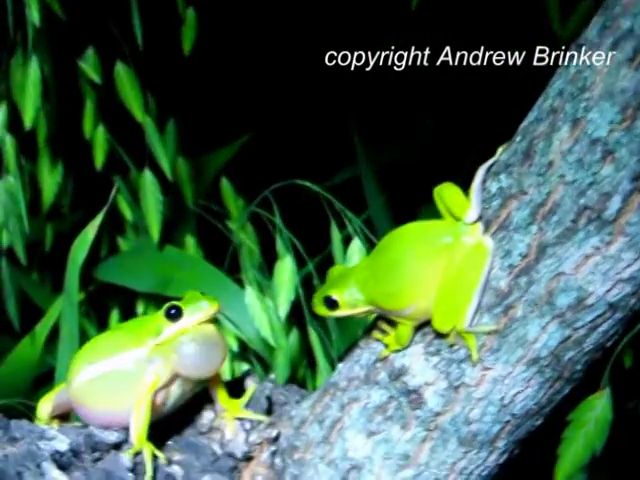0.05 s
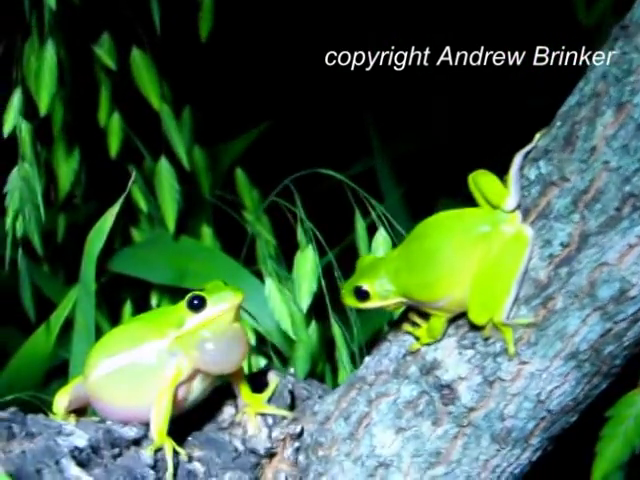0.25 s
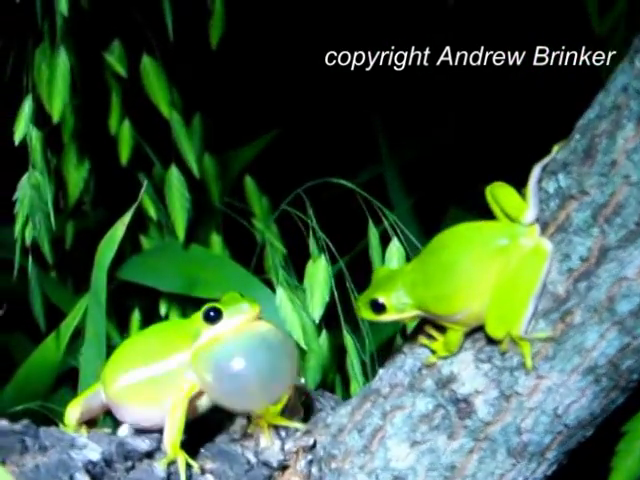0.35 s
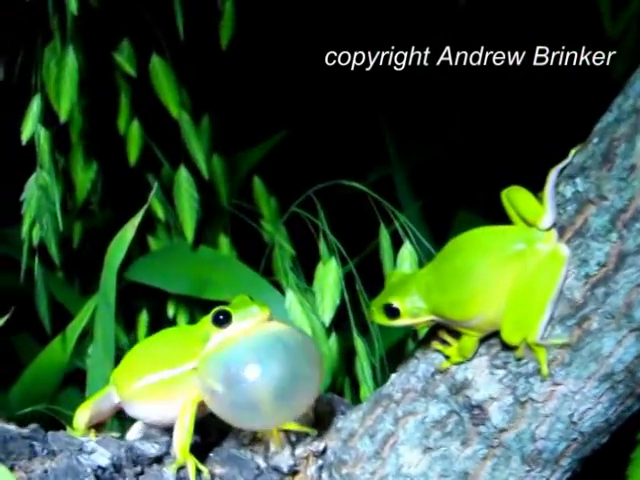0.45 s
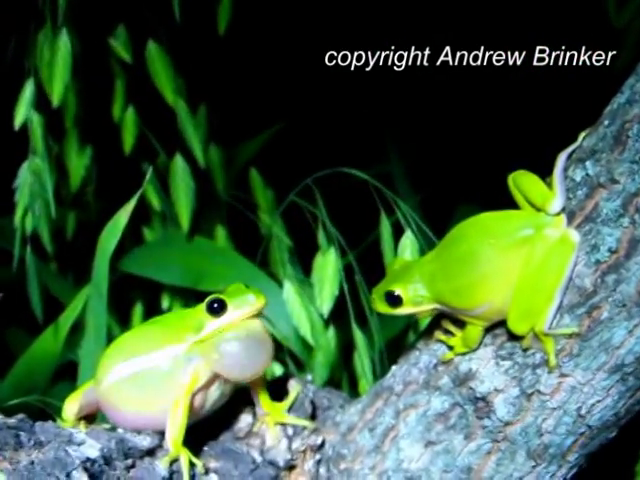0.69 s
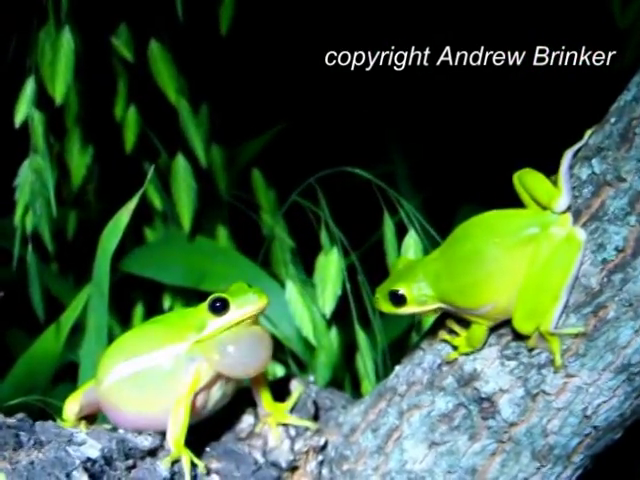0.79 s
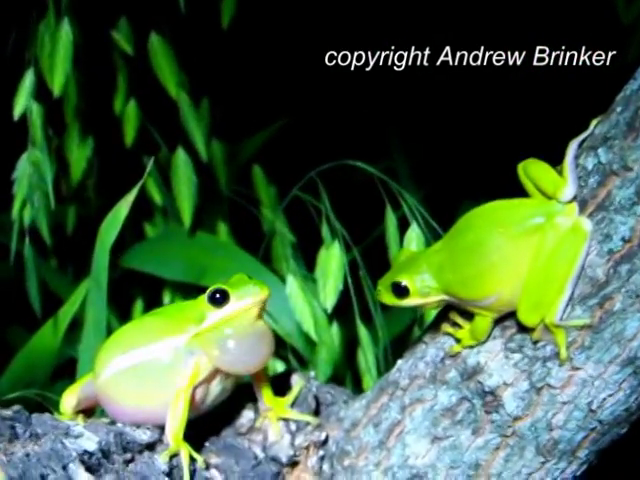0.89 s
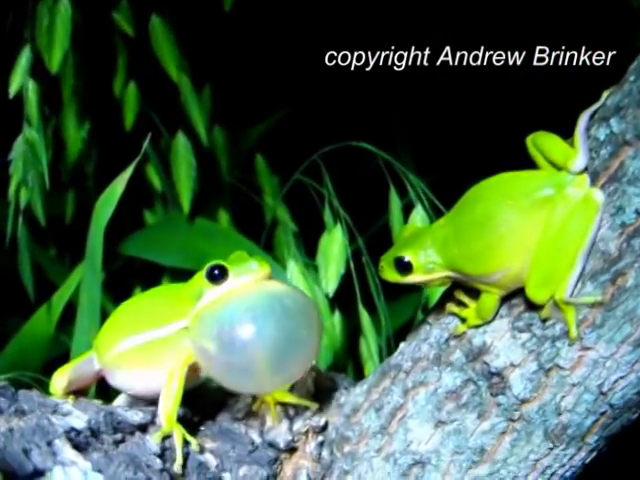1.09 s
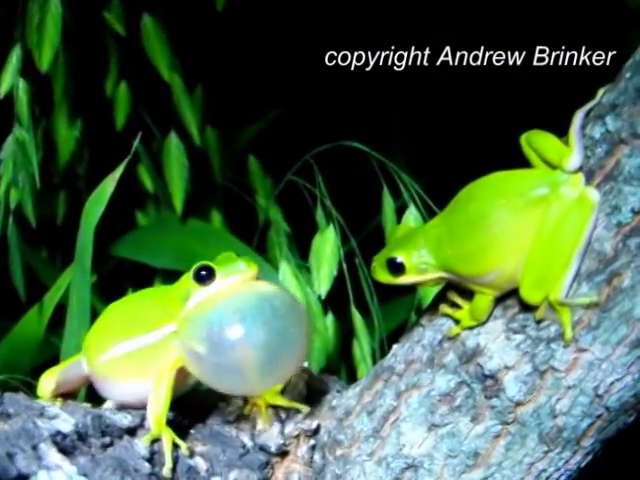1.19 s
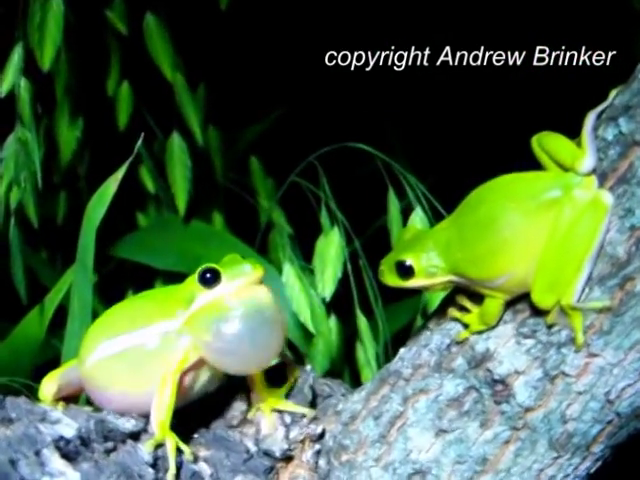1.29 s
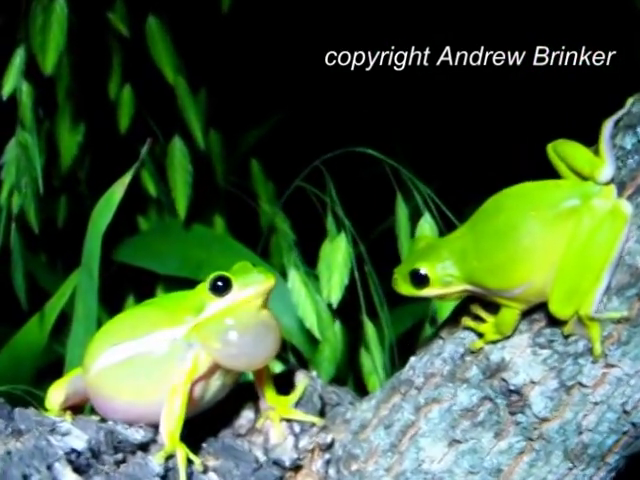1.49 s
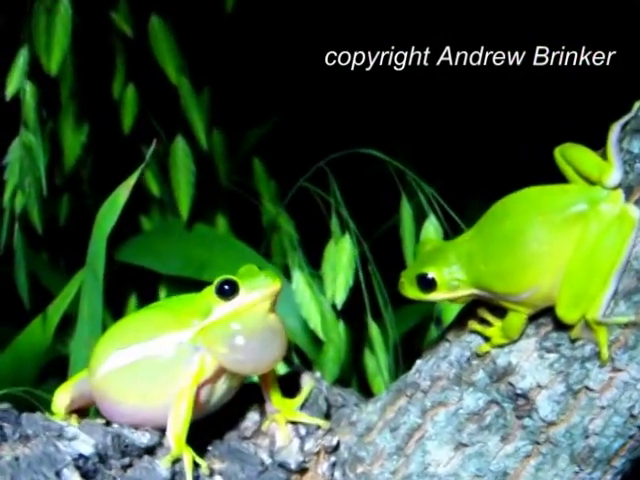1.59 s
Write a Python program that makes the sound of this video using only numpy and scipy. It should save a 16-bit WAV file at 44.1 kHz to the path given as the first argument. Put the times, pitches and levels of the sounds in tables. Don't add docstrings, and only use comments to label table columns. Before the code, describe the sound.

A tree frog close to the microphone gives two loud, nasal, rasping croaks, at about 0.23-0.43 and 0.91-1.09 seconds. The first starts slowly, locks into a bright buzz and tails off; the second starts rough and ends stumbling. Quieter frogs answer throughout, clearest near 1.3 and 1.6, over a blurred woodland chorus and faint cricket scrapes that dip under the croaks.

```python
import sys
import numpy as np
from scipy import signal
from scipy.fft import rfft, irfft, next_fast_len
from scipy.io import wavfile
from scipy.ndimage import uniform_filter1d

SR = 44100
rng = np.random.default_rng(int(sys.argv[2]) if len(sys.argv) > 2 else 0)


def invert_db(level):
    return 10 ** (np.asarray(level, dtype=float) / 20)


def wav_out(sig):
    wavfile.write(sys.argv[1], SR, np.round(np.clip(np.atleast_2d(sig).T, -1, 1) * 32767).astype(np.int16))


N = 72765
AIR_TOP_HZ = 12700

# time in seconds, rate in pulses per second,
# level in dB, sac resonance in Hz, roughness [0-1].
CROAKS = [
    [(.229, 134, -17.5, 2640, 0.43), (.248, 170, -9, 2530, 0.6), (.256, 174, -10, 2740, 0),
     (.27, 287, -9, 2830, 0), (.29, 288, -7.5, 2780, 0.03), (.36, 283, -12.5, 3108, 0.07),
     (.393, 277, -18, 2840, 0.51), (.399, 940, -30.5, 3100, 0.1), (.432, 650, -46, 2430, 0.2)],
    [(.906, 82, -12.5, 2380, 0.62), (.921, 144, -10.5, 2500, 0.33), (.93, 340, -10, 2755, 0.16),
     (.944, 200, -7, 2580, 0.1), (.951, 290, -9, 2840, 0.02), (1.012, 284, -9.5, 3018, 0.05),
     (1.036, 282, -17.5, 3080, 0.12), (1.056, 210, -16, 2910, 0.71), (1.086, 157, -24.5, 3130, 0.41)],
]


def unit(x):
    return x / np.sqrt(np.mean(x ** 2) + 1e-20)


def filtered(x, response):
    size = next_fast_len(N + 8192)
    spectrum = rfft(x, size) * response(np.fft.rfftfreq(size, 1 / SR))
    return irfft(spectrum, size)[..., :N]


def peak(f, hz, width_hz):
    return 1j * f * width_hz / (hz * hz - f * f + 1j * f * width_hz)


def steep(ratio, order):
    poles = np.exp(1j * np.pi * (2 * np.arange(order) + order + 1) / (2 * order))
    return 1 / np.prod(1j * ratio[..., None] - poles, axis=-1)


def low_cut(hz):
    edge_hz = 715
    return steep(edge_hz / (hz + 1), order=12).conj()


def pan(db):
    return invert_db([[db / 2], [-db / 2]])


def hiss(points, alike, patchy_db):
    z = signal.stft(rng.standard_normal((2, N)), nperseg=512)[2]
    patches = uniform_filter1d(rng.standard_normal(z.shape[1:]), size=5, axis=0)
    patches = unit(uniform_filter1d(patches, size=8, axis=1))
    a, b = signal.istft(z * invert_db(patchy_db * patches), nperseg=512)[1][:, :N]
    turn = np.arccos(np.clip(alike, 0, 1)) / 2
    mid, side = np.cos(turn) * a, np.sin(turn) * b
    f, db = np.transpose(points)

    def colour(hz):
        return invert_db(np.interp(np.log(hz + 1), np.log(f + 1), db, -120, -120))

    return unit(filtered(np.array([mid + side, mid - side]), colour))


def woods(x, t60, alike):
    t = np.arange(SR // 2) / SR
    a, b = rng.standard_normal((2, len(t))) * invert_db(-60 * t / t60)
    tail = np.array([a, alike * a + np.sqrt(abs(1 - alike ** 2)) * b])
    return signal.fftconvolve(x[None], tail / np.linalg.norm(a), axes=1)[:, :N]


def croak(rows, throat_db=0, size=1, air_db=0):
    # frequency in Hz, width in Hz, level in dB.
    throat_modes = [(866, 71.3, -8.5), (1093, 122, -15), (2000, 1240, -20), (2186, 353, -15)]
    # frequency in Hz, width in Hz, level in dB.
    air_modes = [(4900, 860, -23.5), (6880, 2000, -41), (9180, 1100, -32), (11900, 2800, -34)]
    ring, max_pulses = 1024, 80
    jitter, scatter_db, slack_throat_db = 0.086, 4, 17.5
    rasp, air_noise = 0.45, 0.35
    sac_width_hz, sac_skirt_hz, sac_skirt_db, sac_top = 190, 900, -15, 1.125

    s, rate, db, sac_hz, rough = np.transpose(rows)
    t = np.arange(s[0], s[-1], 1 / SR)
    turns = np.cumsum(np.interp(t, s, rate)) / SR
    when = np.interp(np.arange(min(int(turns[-1]) + 1, max_pulses)), turns, t)
    columns = (rate, db, sac_hz, np.clip(rough, 0, 1))
    rate, db, sac_hz, rough = [np.interp(when, s, c)[:, None] for c in columns]
    luck = rng.standard_normal((len(when), 3 + len(throat_modes))) * rough
    grit = rng.standard_normal((len(when), 128)) * np.hanning(128)
    grit = rfft(grit, ring) / np.sqrt(48)
    when = when + jitter * luck[:, 0] / rate[:, 0]

    f = np.fft.rfftfreq(ring, 1 / SR)
    body = peak(f, sac_hz * (1 + 0.044 * luck[:, 1:2]), sac_width_hz * (1 + 2 * rough))
    body = body + invert_db(sac_skirt_db) * peak(f, sac_hz, sac_skirt_hz)
    for k, (hz, width_hz, level_db) in enumerate(throat_modes):
        low = k < 2
        tuned_hz = hz / size if low else hz * np.minimum(sac_hz / 2700, 1)
        mode_db = level_db + throat_db * low + slack_throat_db * rough + scatter_db * luck[:, 3 + k, None]
        body = body + (-1) ** k * invert_db(mode_db) * peak(f, tuned_hz, width_hz)
    voiced = body * (1 - rough + rasp * rough * grit) * steep(f / (sac_top * sac_hz), order=8)

    air = sum(invert_db(level_db + air_db) * peak(f, hz, width_hz) ** 2 for hz, width_hz, level_db in air_modes)
    air = air * steep(f / AIR_TOP_HZ, order=24)
    breath = air * (1 - rough) ** 2 * (0.5 + air_noise * grit)

    start = np.floor(when * SR)
    shift = np.exp(-2j * np.pi * f / SR * (when * SR - start)[:, None])
    rings = irfft((voiced + breath) * shift, ring)
    rings *= np.sqrt(SR / 285 / np.sum(rings ** 2, 1, keepdims=True))
    rings *= invert_db(db + 0.5 * scatter_db * luck[:, 2:3])
    at = (start[:, None] + np.arange(ring) + SR).astype(int)
    return np.bincount(at.ravel(), rings.ravel(), N + 3 * SR)[SR:SR + N]


def near_frog():
    square, cube, overtone_db, slack_at = 0.4, 0.05, -1.5, 0.58
    near_pan_db, bend_pan_db, wet_db = 0.75, -4, -17
    t = np.arange(N) / SR
    x = filtered(sum(croak(rows) for rows in CROAKS), low_cut)
    s, rough = np.transpose([(row[0], row[4]) for rows in CROAKS for row in rows])
    taut = np.clip(1 - np.interp(t, s, rough) / slack_at, 0, 1)

    def bend_response(hz):
        return peak(hz, 400, 1300) + invert_db(overtone_db) * peak(hz, 5800, 4000)

    bend = taut * (square * filtered(x * x, bend_response) + cube * x ** 3)
    return pan(near_pan_db) * x - pan(bend_pan_db) * bend + invert_db(wet_db) * woods(x, 0.06, 0.7)


def far_call(s, length, rate, db, throat_db, sac_hz, rough):
    rise_hz, sag, far_air_db = 324, 0.0497, -14
    rows = [(s, 0.55 * rate, db - 9, sac_hz, 0.6),
            (s + 0.2 * length, rate, db - 2, sac_hz + 0.4 * rise_hz, rough),
            (s + 0.404 * length, rate, db, sac_hz + 0.55 * rise_hz, rough),
            (s + 0.8 * length, rate * (1 - sag), db - 4, sac_hz + rise_hz, rough),
            (s + length, 0.6 * rate, db - 12, sac_hz + rise_hz, 0.7)]
    return croak(rows, throat_db, size=286 / rate, air_db=far_air_db)


def neighbours():
    # start in seconds, length in seconds, rate in pulses per second,
    # level in dB, throat over sac in dB.
    answers = [(-.06, .13, 255, -36.5, 10), (0.052, 0.11, 271, -38, 26), (0.116, 0.12, 277, -33, -6.5),
               (.465, .16, 278, -31.5, 3.5), (.64, 0.12, 262, -33.5, 8.5), (0.826, 0.17, 268, -30, -0.5),
               (1.075, .16, 283, -31.5, 3), (1.301, .18, 272.5, -28, 10), (1.39, .1, 262, -40.5, 1),
               (1.55, .1, 312, -38.5, 19), (1.606, 0.15, 258, -29.5, 9)]
    pan_db, wet_db = 1, -9
    x = sum(far_call(*row, sac_hz=2544, rough=0.04) for row in answers)
    return pan(pan_db) * x + invert_db(wet_db) * woods(x, 0.17, 1.0)


def chorus():
    # time in seconds, level in dB.
    swell_points = [(0, -33.5), (.2, -29.5), (.5, -36.5), (.8, -34), (1.1, -36.5), (1.27, -36), (1.4, -32),
                    (1.52, -38.5), (1.65, -31.5)]
    # frequency in Hz, density in dB per Hz.
    haze_colour = [(680, -33), (760, -26), (1300, 24), (1750, -14), (2300, 6), (3300, -33), (3800, -18)]
    rate_hz, rate_spread, throat_db, t60_s = 268, 0.035, 6.5, 0.67
    pan_db, haze_db = -2, -52
    luck = rng.standard_normal((26, 4))
    starts = np.linspace(-0.4, N / SR, len(luck)) + 0.03 * luck[:, 0]
    x = 0
    for start, (_, a, b, c) in zip(starts, luck):
        rate, sac_hz = rate_hz * (1 + rate_spread * a), 2500 * (1 + 0.087 * c)
        x = x + far_call(start, 0.15, rate, 0.83 * b, throat_db, sac_hz, rough=0.1)
    s, db = np.transpose(swell_points)
    swell = invert_db(np.interp(np.arange(N) / SR, s, db))
    far = unit(0.5 * x + woods(x, t60_s, 0.8))
    return swell * pan(pan_db) * far + invert_db(haze_db) * hiss(haze_colour, 1.0, patchy_db=3.5)


def crickets():
    # start in seconds, length in seconds, frequency in Hz, level in dB.
    chirps = [(0.027, 0.2, 4065, -42), (0.222, 0.042, 3994, -32), (0.491, .08, 3906, -37),
              (0.649, 0.051, 4010, -38), (0.734, 0.07, 4000, -36.5), (0.889, 0.074, 4150, -32.5),
              (1.104, 0.098, 4100, -45), (1.32, .04, 4043, -39.5), (1.457, 0.04, 4076, -38),
              (1.577, 0.06, 4020, -39), (1.13, .05, 7030, -61)]
    # frequency in Hz, density in dB per Hz.
    insect_colour = [(3000, -17), (3400, -9), (4040, -5.5), (4880, -20.5), (6660, -20.5), (7300, -40.5),
                     (9500, -69), (11000, -71)]
    width_hz, insects_db = 162, -41.5
    t, out = np.arange(N) / SR, 0
    for s, length, hz, db in chirps:
        tone = unit(filtered(rng.standard_normal(N), lambda f: peak(f, hz, width_hz) ** 2))
        out = out + invert_db(db) * tone * np.sin(np.pi * np.clip((t - s) / length, 0, 1))
    insects = invert_db(insects_db) * pan(-2.2) * hiss(insect_colour, 0.27, patchy_db=3.5)
    return pan(-1.5) * out + invert_db(-2.5) * woods(out, 0.33, 0.2) + insects


def ducking():
    duck_db, attack_s, recover_s = -3.5, 0.021, 0.066
    t = np.arange(N) / SR
    gain_db = 0
    for rows in CROAKS:
        drop = np.clip((t - rows[0][0]) / attack_s, 0, 1)
        gain_db = gain_db + duck_db * drop * np.exp(-np.clip(t - rows[-1][0], 0, 9) / recover_s)
    return invert_db(gain_db)


def scene():
    return near_frog() + ducking() * filtered(neighbours() + chorus() + crickets(), low_cut)


def band_limit(x):
    return signal.sosfilt(signal.butter(12, 14820, fs=SR, output="sos"), x)


def record(dry):
    # frequency in Hz, density in dB per Hz.
    rumble_colour = [(15, -69.5), (25, -28), (71, -15), (123, -1.5), (348, -16), (539, -8), (600, -5.5),
                     (780, -32.5), (1320, -120)]
    rumble_db, ceiling, top_hz, above_top_db = -69, 0.97, 14800, -27
    x = dry + invert_db(rumble_db) * hiss(rumble_colour, 0.85, patchy_db=1.0)
    x = x / (1 + abs(x / ceiling) ** 6) ** (1 / 6)

    def band(hz):
        return (hz < top_hz) * np.where(hz < AIR_TOP_HZ + 150, 1, invert_db(above_top_db))

    return band_limit(filtered(x, band))


dry = scene()
out = record(dry)
wav_out(out)
```